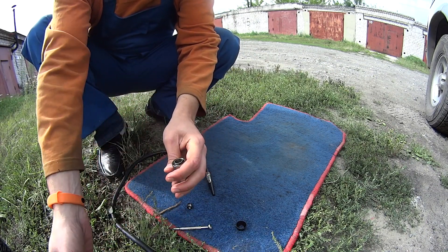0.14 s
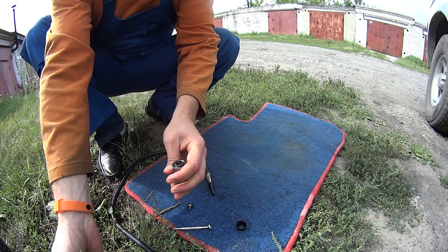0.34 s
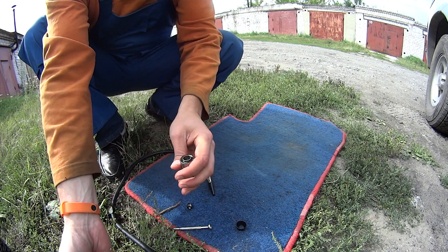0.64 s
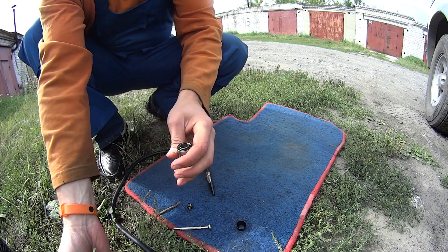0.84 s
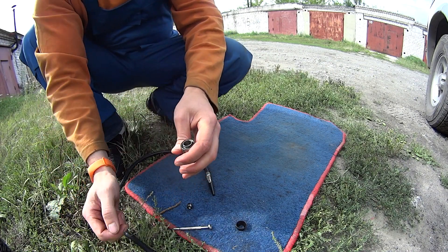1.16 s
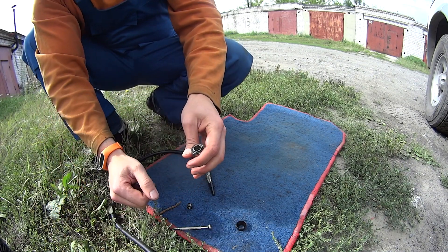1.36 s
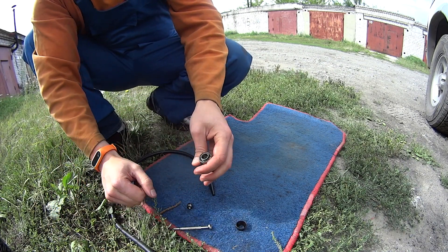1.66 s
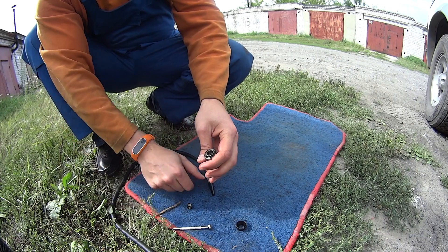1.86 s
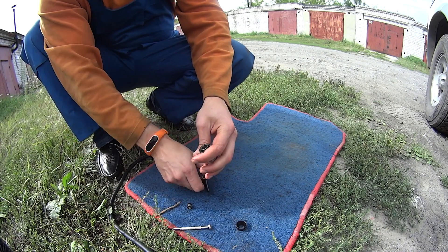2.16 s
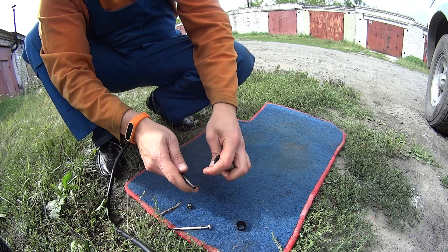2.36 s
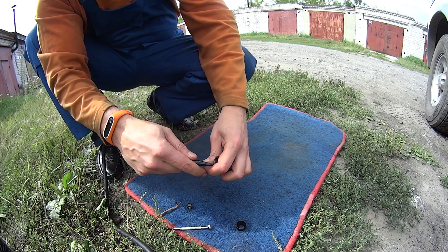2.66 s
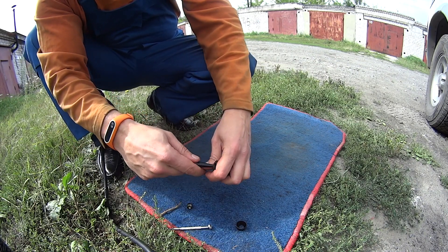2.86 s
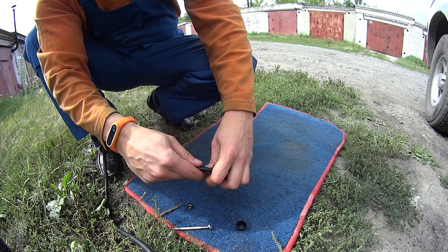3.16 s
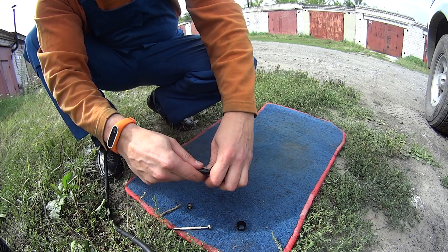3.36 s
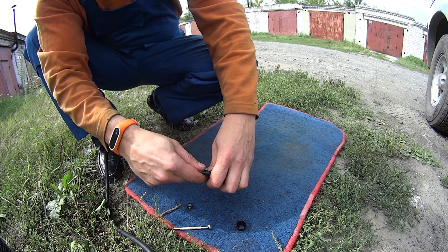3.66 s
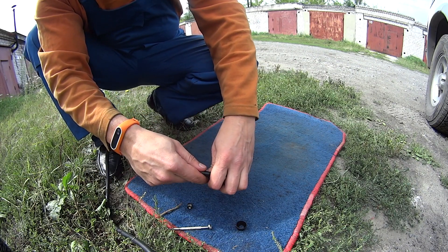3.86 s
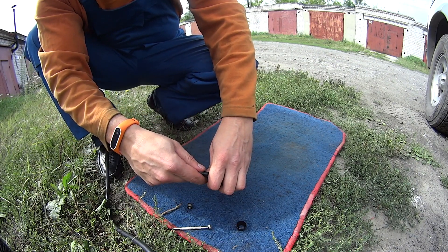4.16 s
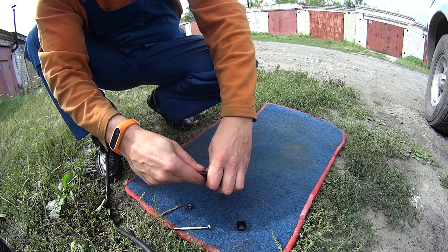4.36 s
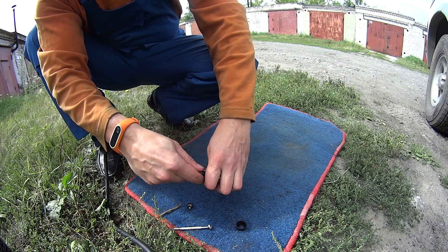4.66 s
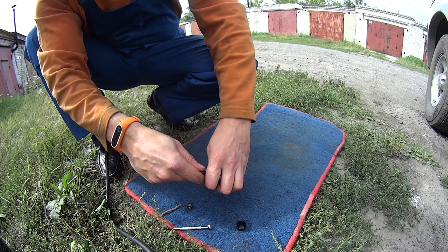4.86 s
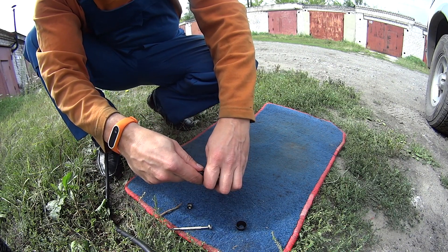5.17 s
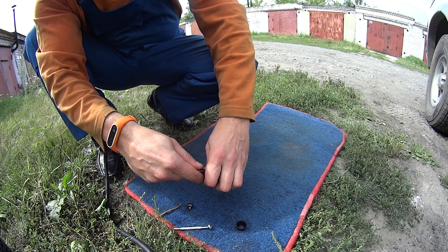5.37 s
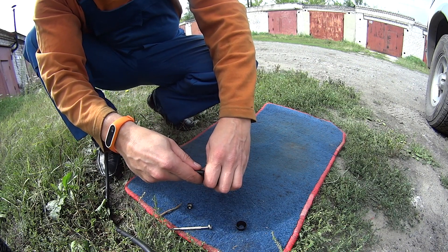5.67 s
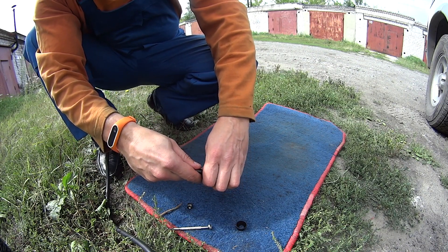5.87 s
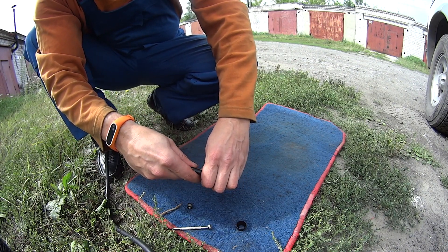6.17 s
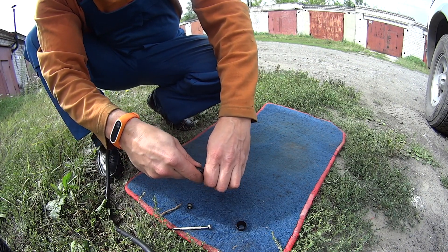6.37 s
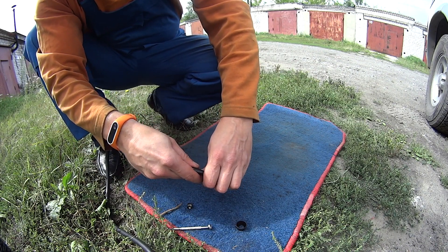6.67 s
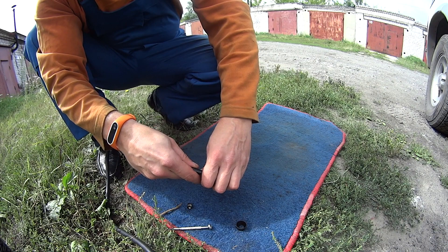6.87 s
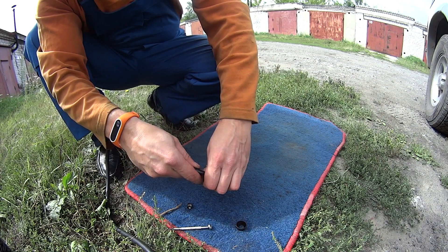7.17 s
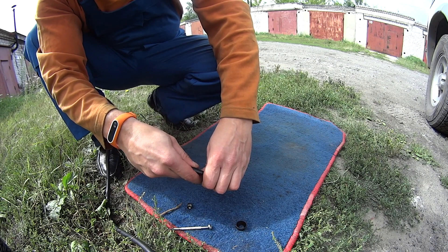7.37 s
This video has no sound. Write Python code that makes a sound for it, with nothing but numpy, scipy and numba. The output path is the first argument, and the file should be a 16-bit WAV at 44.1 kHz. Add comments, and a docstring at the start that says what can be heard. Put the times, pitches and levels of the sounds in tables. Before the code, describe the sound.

At first there is only a low distant outdoor rumble with light wind. At 0.8 seconds a switch snaps and a small electric piston compressor clacks up to speed almost at once, close by and slightly left. It runs on with a fast, buzzing clatter of piston, valves and casing, while soft puffs leave the open hose. At 2.8 seconds the nozzle is set on a small part: the pump briefly dips in level and air spits several times, then settles into a bright, pulsing hiss. From about 3.8 seconds the nozzle is pressed home repeatedly, each time slowing and quietening the motor and evening the hiss into a high, shifting half-whistle. This is clear from 4.5 to 5.4 seconds, strongest around 6.4, where the pump labours and chirps, and returns around 7.1. The motor recovers, and pump and hiss continue until the end, near 7.7 seconds.

```python
"""Outdoors, over a low distant rumble, a switch snaps and a small electric piston compressor clacks up to speed.
On each turn its outlet valve chirps, its intake reed honks and its crank clatters against the casing,
while soft puffs leave the open hose. Then the nozzle is set on a small part: the air spits, and settles
into a pulsing hiss. As the nozzle is pressed home, back pressure slows and quietens the motor
and evens the hiss into a steady half-whistle."""
import sys
import numpy as np
from scipy import signal
from scipy.fft import rfft, irfft
from scipy.io import wavfile
from scipy.ndimage import uniform_filter1d
from numba import njit

SR = 44100
rng = np.random.default_rng(int(sys.argv[2]) if len(sys.argv) > 2 else 0)


def wav_out(sig):
    """Save sig, one row per channel (or a flat mono array), as 16-bit PCM at SR to the path in sys.argv[1]."""
    wavfile.write(sys.argv[1], SR, np.round(np.clip(np.atleast_2d(sig).T, -1, 1) * 32767).astype(np.int16))


N = 331632
T = np.arange(N) / SR
FREQS = np.maximum(np.arange(N // 2 + 1) * SR / N, 1)
SWITCH_ON_S, NOZZLE_ON_S = 0.808, 2.8


def undb(db):
    """Decibels to gain."""
    return 10 ** (np.asarray(db) / 20)


def unit(x):
    """Scale to an rms of one."""
    return x / np.sqrt(np.mean(x ** 2))


def since(cue_s):
    """Seconds since a cue, zero before it."""
    return np.maximum(T - cue_s, 0)


def curves(table):
    """Automation lanes: the columns of a table, joined by straight lines in time."""
    times, *columns = np.transpose(table)
    return [np.interp(T, times, column) for column in columns]


def response(points):
    """An EQ curve from (frequency [Hz], gain [dB]) points."""
    hz, db = np.transpose(points)
    return undb(np.interp(np.log(FREQS), np.log(hz), db))


def colour(x, gain):
    """Filter by a gain for every frequency."""
    return irfft(rfft(x) * gain, N)


def ring(x, modes):
    """Drive a set of damped resonances."""
    peaks = (undb(db) / (1 + 1j * (FREQS ** 2 - hz ** 2) / (FREQS * width)) for hz, width, db in modes)
    return colour(x, sum(peaks))


@njit
def bandpass(x, hz, width):
    """State-variable band-pass with a moving centre."""
    y, band, low = np.empty(len(x)), 0., 0.
    for i in range(len(x)):
        g, damping = np.tan(np.pi * hz[i] / SR), width / hz[i]
        v = (band + g * (x[i] - low)) / (1 + g * (g + damping))
        band, low, y[i] = 2 * v - band, low + 2 * g * v, damping * v
    return y


def pan(db):
    """Left and right gains for a level difference; positive is left."""
    return undb(np.array([[db], [-db]]) / 2)


def pair(mid, side, side_db):
    """Left and right from mid and side."""
    return mid + undb(side_db) * side * np.array([[1], [-1]])


def noise(side_db):
    """Stereo white noise; the side level sets its width."""
    return pair(*rng.standard_normal((2, N)), side_db)


def lobe(turn, centre, width):
    """A smooth swell once a turn; centre and width in turns."""
    return np.exp(-.5 * (((turn - centre + .5) % 1 - .5) / width) ** 2)


# tone of the outdoor bed: (frequency [Hz], gain [dB])
AMBIENCE_EQ = [(25, -25), (41, -10), (80, -7.5), (110, -6.5), (160, -8), (205, -16), (262, -6.5),
               (330, -11), (468, -13.5), (588, -16.5), (900, -15.5), (1400, -28), (2000, -32.5),
               (2700, -37), (11000, -41.5)]


def ambience():
    """A bed of distant rumble and light wind, narrow in the bass; it drops just before the motor starts."""
    db = -43 - 6 * np.clip((T - 0.714) / 0.0078, 0, 1)
    mid, side = colour(rng.standard_normal((2, N)), response(AMBIENCE_EQ))
    side = colour(side, response([(100, -13), (500, 2)]))
    return unit(pair(mid, side, side_db=-4)) * undb(db) * pan(-0.99)


# brief dips as the hiss sets in: (time [s], nominal depth [dB])
DIPS = [(2.805, 7), (2.945, 6.5)]


def duck(x, attack_s=0.025, release_s=0.17):
    """The level dips quickly and recovers slowly; the bass dips furthest."""
    gain = undb(-sum(db * np.clip(since(s) / attack_s, 0, 1) * np.exp(-since(s) / release_s)
                     for s, db in DIPS))
    bass = colour(x, response([(250, 2), (340, -28)]))
    return gain * (x + 0.68 * (gain - 1) * bass)


def switch():
    """The power switch snaps shut: a bright transient with a short, faint tail."""
    age = since(SWITCH_ON_S)
    snap = (1 - np.exp(-age / 0.00034)) * (np.exp(-age / 0.0024) + 0.078 * np.exp(-age / 0.033))
    body = response([(300, -36), (1100, 1), (1600, -17), (2300, 4),
                     (4000, -3), (6500, 8), (8200, 9), (11000, -10)])
    return undb(-16) * snap * unit(colour(noise(side_db=-4), body)) * pan(7.1)


# metallic ring of the first strokes: (frequency [Hz], bandwidth [Hz], gain [dB])
CLACK_MODES = [(990, 76, 2), (6380, 190, 0), (7650, 400, 5), (8140, 410, 4)]


def piston_clacks(turn):
    """The piston clacks against its slack on each stroke, fading as the motor comes up to speed."""
    clacks = lobe(turn, 0.23, 0.043) * np.clip(turn, 0, 1) * np.exp(-since(SWITCH_ON_S) / 0.12)
    return undb(-21) * clacks * unit(ring(noise(side_db=-6), CLACK_MODES)) * pan(3.5)


# tone of air leaving the open hose: (frequency [Hz], gain [dB])
HOSE_EQ = [(1000, 4), (2500, 0), (3700, -7), (5000, 1), (6270, 5), (6700, -6), (7400, 1.5), (8200, 2.5),
           (9000, -0.5), (9550, 3.5), (10400, -0.5), (11000, 0.5)]


def open_hose(turn, pace, fill_s=0.054):
    """Each stroke puffs out of the free nozzle, louder and earlier in the turn while the crank is slow."""
    db = -33 + 10 * (1 - pace)
    filled = np.clip(since(SWITCH_ON_S) / fill_s, 0, 1) ** 2
    crest = .33 - 0.1 * (1 - pace)
    # the puffs stand apart at first and run together at speed
    between = pace ** 3 * (0.2 + 0.34 * lobe(turn, 0.72, 0.28))
    puffs = lobe(turn, crest, 0.095) + between
    fade_out = np.clip(1 - since(NOZZLE_ON_S) / 0.047, 0, 1)
    air = colour(noise(side_db=-11.5), response(HOSE_EQ))
    return unit(puffs * air) * undb(db) * filled * fade_out * pan(3.8)


# air at the nozzle: (time [s], relative level [dB], gap resonance [Hz], relative top treble [dB])
JET_LANES = [(2.82, -31, 6250, -6), (2.9, -31.5, 6860, -8), (3.21, -30, 5670, -10), (3.54, -28.5, 7250, -5),
             (3.62, -29.5, 6620, -7.5), (4.36, -29.5, 7360, -5), (5.03, -28, 7200, -7),
             (5.11, -28, 7800, -4), (5.27, -27, 7040, -8.5), (5.71, -28.5, 7000, -5.5),
             (6.08, -28.5, 5370, -8), (6.29, -29, 5820, -8.5), (6.34, -31.5, 5310, -6),
             (6.38, -39, 6280, -4.5), (6.43, -26, 5870, -7), (6.52, -26, 8060, -6), (6.62, -32, 8250, -7),
             (6.96, -27.5, 8400, -4), (7.03, -29.5, 6590, -6), (7.13, -29, 6270, -5.5),
             (7.24, -29, 7700, -5), (7.52, -30, 7670, -5.5)]
# tone of the raw hiss: (frequency [Hz], gain [dB])
HISS_EQ = [(1000, -9.5), (2500, -9.5), (3700, -5.5), (4700, 0.5), (6000, 0), (7500, -2.5), (9000, 1.5),
           (11000, -2.5)]
# resonances of the nozzle and the part it sits on: (frequency [Hz], bandwidth [Hz], gain [dB])
NOZZLE_MODES = [(4750, 150, -8), (5180, 220, -3.5), (6310, 180, -7.5), (6800, 160, -2.5), (7550, 200, -4.5),
                (8400, 270, -17)]
# the part's bore, ringing while the nozzle is loose: (frequency [Hz], bandwidth [Hz], gain [dB])
BORE_MODES = [(5500, 300, -20), (5980, 280, 3), (7600, 230, 8.5), (7750, 160, -13)]
# hard spits while the nozzle finds its seat: (time [s], boost [dB])
SPITS = [(2.831, 5.5), (2.869, 4.5), (2.908, 5), (3.08, 2), (3.139, 6), (3.177, 3.5)]


def nozzle_jet(turn, pace, trim_db=2, treble_lift_db=7.5, spit_s=0.0035):
    """Air squeezes through the gap at the nozzle; back pressure evens the puffs into a steady hiss."""
    level_db, gap_hz, treble_db = curves(JET_LANES)
    pressure, age = 1 - pace, since(NOZZLE_ON_S)
    rms_window = SR // 25
    # uneven bursts at first, settling as the nozzle seats
    loose = np.exp(-(age / 1.1) ** 2)
    stroke = turn.astype(int)
    stroke_gain = undb((.5 + 0.46 * loose) * rng.standard_normal(stroke[-1] + 1)[stroke])
    leak = .25 - 0.1 * loose + 5.5 * pressure
    flow = leak + lobe(turn, 0.36, .11 - 0.0044 * loose) + 0.47 * lobe(turn, 0.74, 0.07)
    flow *= stroke_gain / np.sqrt(uniform_filter1d(flow ** 2, rms_window))
    air = colour(noise(side_db=-12), response(HISS_EQ))
    air = air + ring(air, NOZZLE_MODES) + np.exp(-age / 0.48) * ring(air, BORE_MODES)
    # the gap half whistles: higher as it narrows, stronger under back pressure
    whistle_db = -5.5 + 15.5 * np.tanh(pressure / 0.06)
    air += undb(whistle_db) * np.array([bandpass(channel, gap_hz, width=2100.) for channel in air])
    sizzle = colour(air, response([(7000, -38), (9000, 7)]))
    air += (undb(treble_db + treble_lift_db) - 1) * sizzle
    air /= np.sqrt(uniform_filter1d(np.mean(air ** 2, axis=0), rms_window))
    spit_db = sum(boost * np.exp(-.5 * ((T - s) / spit_s) ** 2) for s, boost in SPITS)
    fade_in = np.clip((T - NOZZLE_ON_S) / 0.018 + .5, 0, 1)
    return air * flow * undb(level_db + spit_db + trim_db) * fade_in * pan(2.8)


# presses of the nozzle: (time [s], duration [s], speed lost if held [fraction])
PRESSES = [(3.752, 0.0214, 0.169), (3.908, 0.471, 0.0392), (4.525, 0.864, 0.085), (5.717, 0.585, 0.0359),
           (6.3, 0.194, 0.2866), (6.939, 0.2635, 0.1556)]


def back_pressure(build_s=0.2057, bleed_s=0.1396, flywheel_s=0.07):
    """Share of motor speed lost: each press builds up, then bleeds off, smoothed by the flywheel."""
    drag = np.zeros(N)
    for start, length, share in PRESSES:
        build = 1 - np.exp(-np.minimum(since(start), length) / build_s)
        drag += share * build * np.exp(-since(start + length) / bleed_s)
    return uniform_filter1d(drag, int(flywheel_s * SR))


def rattle_loop(turn, size=4096, harmonics=230):
    """A random rattle that loops on every turn of the crank."""
    shape = irfft(np.r_[0, np.exp(2j * np.pi * rng.random(harmonics))], size)
    return unit(np.interp(turn % 1, np.arange(size) / size, shape))


# resonances of the pump casing: (frequency [Hz], bandwidth [Hz], gain [dB])
CASING_MODES = [(764.6, 62, 7), (866, 31, 7), (954, 12, -7.5), (1009, 75, 6), (1387, 69, 0.5),
                (1527, 37, -5), (1710, 6, -12), (1890, 50, -8.5), (2343, 290, -15), (2972, 110, -8.5),
                (4520, 79, -2.5), (5743, 62, 3), (6280, 120, -17)]
# tone of the direct clatter: (frequency [Hz], gain [dB])
CLATTER_EQ = [(100, -6), (155, -1), (235, -6), (315, 6.5), (500, 15.5), (630, 11.5), (715, 7.5), (790, 2.5),
              (1080, 12.5), (1250, 0.5), (1900, -12), (3000, -9), (3500, -56), (6000, -32), (11000, -29)]
# stereo placement of the clatter: (frequency [Hz], left minus right [dB])
CLATTER_PAN = [(350, 11.5), (630, 5.5), (1130, 6), (1500, 11.5), (2200, 17), (3640, 6), (6550, 1),
               (11000, 12)]
# low hum of the shaking housing: (harmonic [multiple of crank speed], relative level [dB])
SHAKE_HARMONICS = [(1, -8), (2, 1), (3, -2), (4, -6.5), (5, -3.5), (6, -6.5)]


def crank(turn, pace):
    """Piston and gear clatter alike on every turn, hardest as the valves work; the housing shakes."""
    load = 0.69 + 2.1 * lobe(turn, 0.36, 0.21) + lobe(turn, 0.79, 0.15)
    rattle = pair(rattle_loop(turn), rattle_loop(turn), side_db=-1.45)
    # the bearings run rougher as the air is held back
    grit = np.interp(T, [NOZZLE_ON_S, 4.2], [.4, .62]) * noise(side_db=-1)
    blows = load * (rattle + grit)
    # the piston's return knocks the casing hardest
    casing = ring(blows * (0.5 + lobe(turn, 0.716, 0.066)), CASING_MODES)
    clatter = undb(-11) * unit(colour(blows, response(CLATTER_EQ))) + undb(-10.5) * unit(casing)
    clatter = colour(clatter, response(CLATTER_PAN) ** np.array([[.5], [-.5]]))
    # one soft kick at the top of each stroke, harder at speed
    shake = -sum(undb(db) * np.cos(2 * np.pi * order * (turn - .4)) for order, db in SHAKE_HARMONICS)
    return clatter + undb(-18.5) * unit(shake) * pace ** 4 * pan(-3.5)


def reed(turn, pace, opens, span, glide_hz, scatter_db):
    """Envelope and tone of a valve reed: it flutters for part of a turn, gliding as the flow bends it."""
    first_hz, last_hz = glide_hz
    stroke = turn.astype(int)
    progress = np.clip((turn - stroke - opens) / span, 0, 1)
    age = T - np.interp(stroke + opens, turn, T)
    accent, detune = rng.standard_normal((stroke[-1] + 1, 2))[stroke].T
    # on slow strokes the reed sings a little higher
    sharp = 1 + 0.34 * np.minimum(1 - pace, .5) + .008 * detune
    phase = 2 * np.pi * age * (first_hz + (last_hz - first_hz) * progress / 2) * sharp
    envelope = np.sqrt(np.abs(np.sin(np.pi * progress))) * undb(scatter_db * accent)
    return envelope, -np.cos(phase)


# resonances of the delivery pipe: (frequency [Hz], bandwidth [Hz], gain [dB])
PIPE_MODES = [(883, 45, -0.5), (997, 100, 6)]


def outlet_valve(turn, pace):
    """The outlet reed chirps and rings on in the pipe, loudest on slow, labouring strokes."""
    envelope, tone = reed(turn, pace, opens=0.139, span=0.222, glide_hz=(823, 926), scatter_db=4.5)
    chirp = envelope * tone
    db = -21 + 16 * np.tanh(3.3 * (1 - pace))
    return undb(db) * unit(chirp + ring(chirp, PIPE_MODES)) * pan(4.5)


def intake_valve(turn, pace, right_lag_s=.00037):
    """The intake reed honks through its filter cup and slaps its seat, ringing the casing."""
    envelope, tone = reed(turn, pace, opens=.413, span=.434, glide_hz=(363, 562), scatter_db=.5)
    flutter = envelope * tone
    cup = ring(flutter, [(356.5, 38, 3.5), (457, 99, -3.5), (632.5, 28, -1.5)])
    honk = unit(colour(flutter + cup, response([(200, -41), (340, 0), (630, 3), (720, 6)])))
    # the pump stands to the left, so the right side hears it late
    honk = np.array([honk, np.interp(T - right_lag_s, T, honk)]) * pan(-1.9)
    slap_eq = response([(500, -34), (750, 6.5), (1100, -2), (1800, -5), (3000, 16.5)])
    slaps = colour(envelope * np.maximum(tone, 0) ** 10, slap_eq)
    return honk + undb(-17) * unit(ring(slaps, CASING_MODES)) * pan(1.5)


def scene():
    """The crank clocks the valves, the clatter and the air; back pressure slows and quietens the pump."""
    free_speed_hz, spin_up_s = 51.753, 0.0625
    drag = back_pressure()
    speed_hz = free_speed_hz * (1 - np.exp(-since(SWITCH_ON_S) / spin_up_s)) * (1 - drag)
    turn = np.cumsum(speed_hz) / SR
    pace = speed_hz / speed_hz.max()  # share of top speed
    valves = intake_valve(turn, pace) + outlet_valve(turn, pace)
    clatter = np.clip(speed_hz / 30, 0, 1) * crank(turn, pace)
    pump = undb(-22.5 - 25 * drag) * (T >= SWITCH_ON_S) * (valves + clatter)
    ducked = duck(pump + ambience())
    return ducked + piston_clacks(turn) + open_hose(turn, pace) + nozzle_jet(turn, pace) + switch()


def record(dry):
    """A steep low-pass takes off the top treble."""
    cutoff_hz = 11150
    return signal.sosfilt(signal.ellip(12, .2, 80, cutoff_hz, fs=SR, output="sos"), dry)


dry = scene()
out = record(dry)
wav_out(out)
```